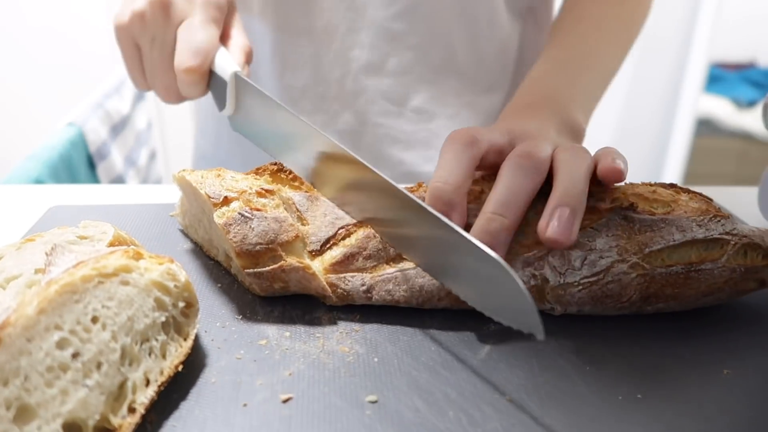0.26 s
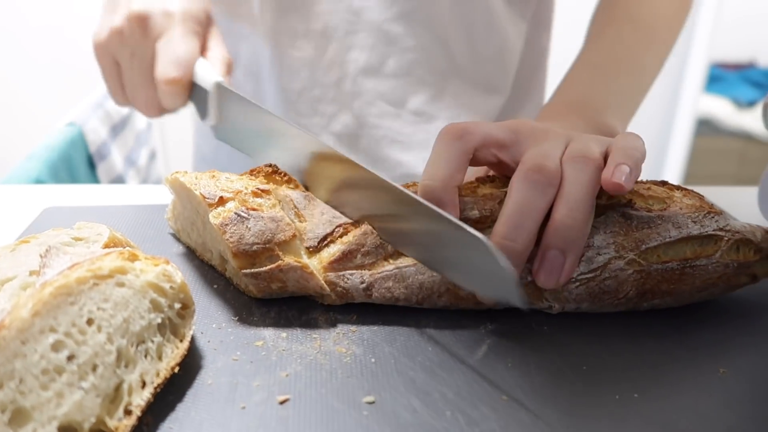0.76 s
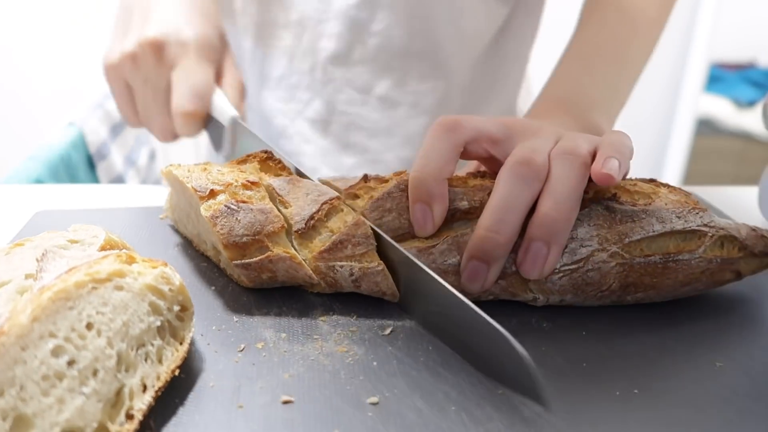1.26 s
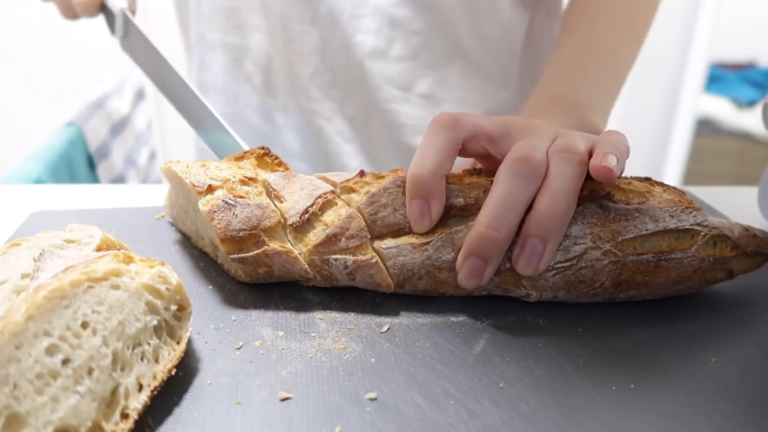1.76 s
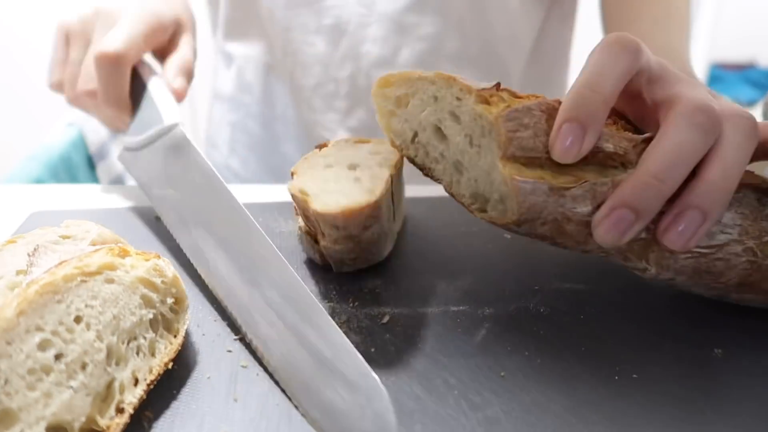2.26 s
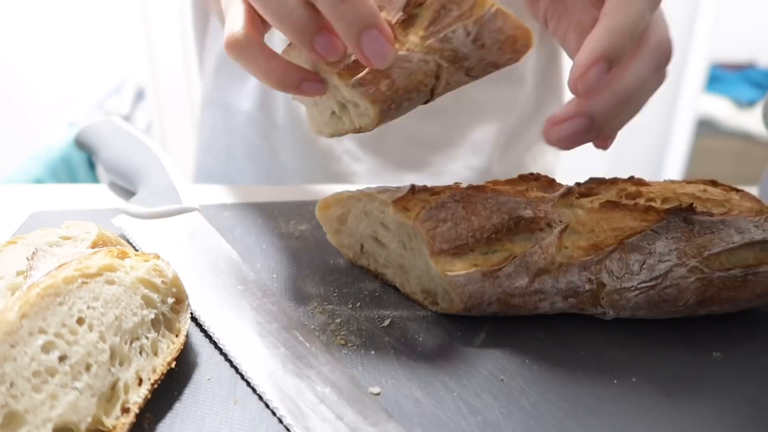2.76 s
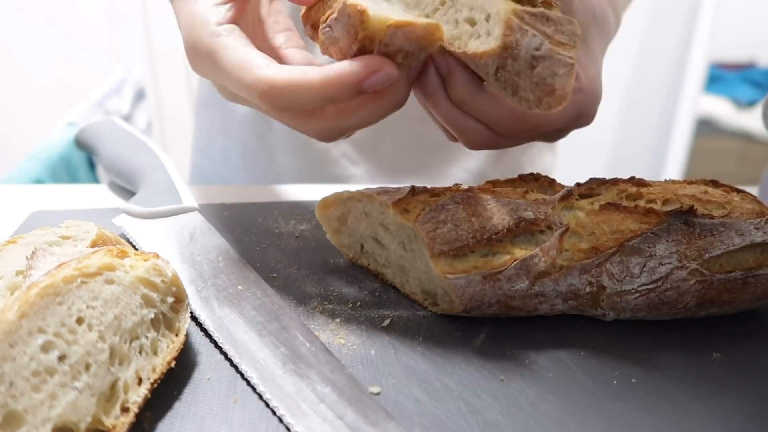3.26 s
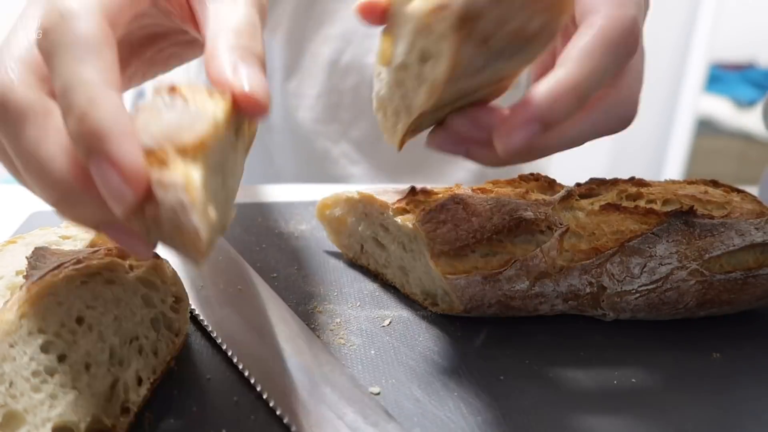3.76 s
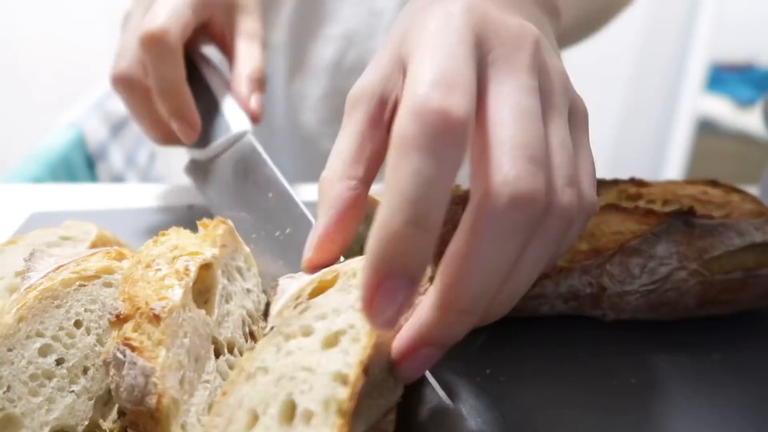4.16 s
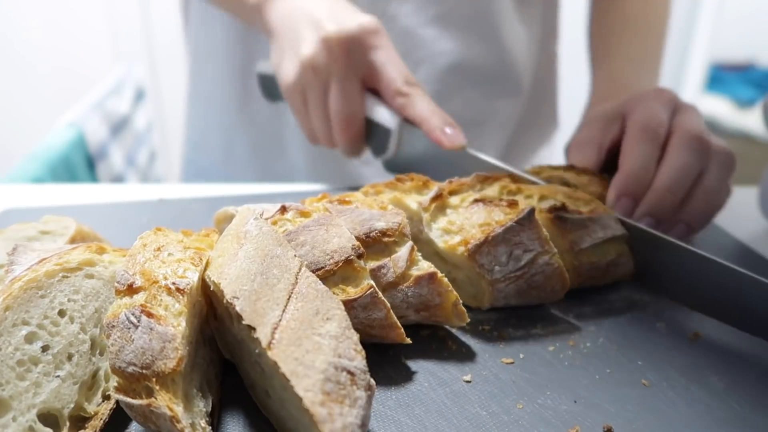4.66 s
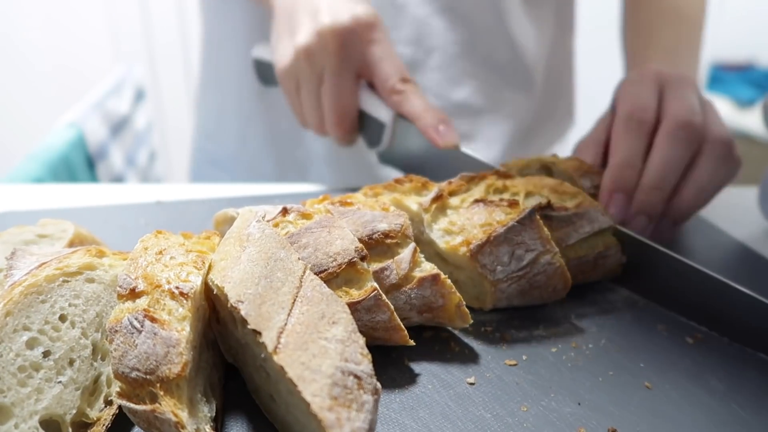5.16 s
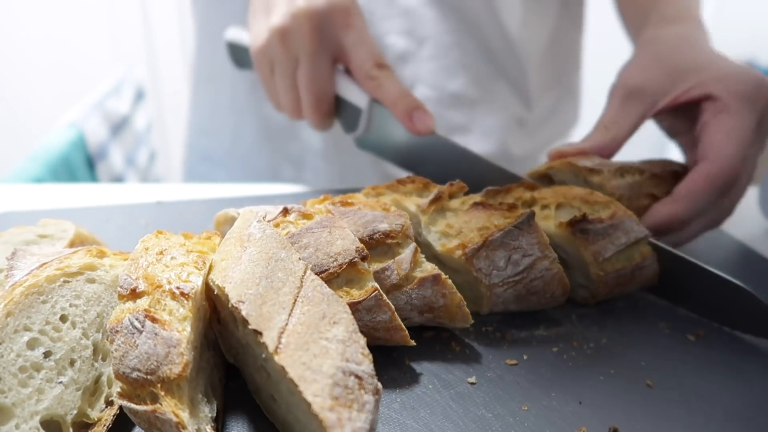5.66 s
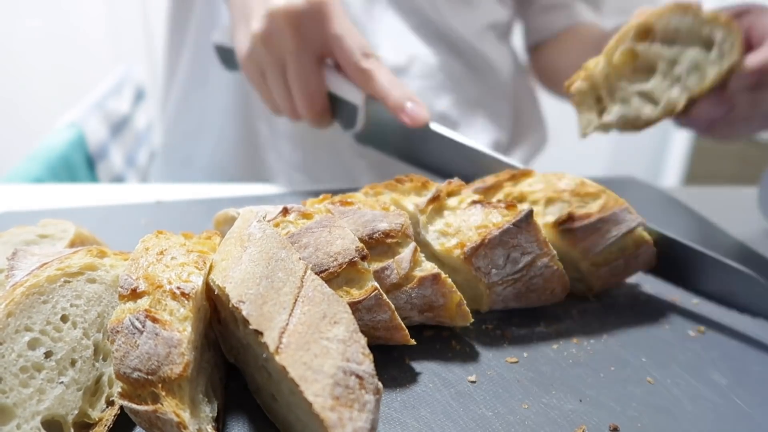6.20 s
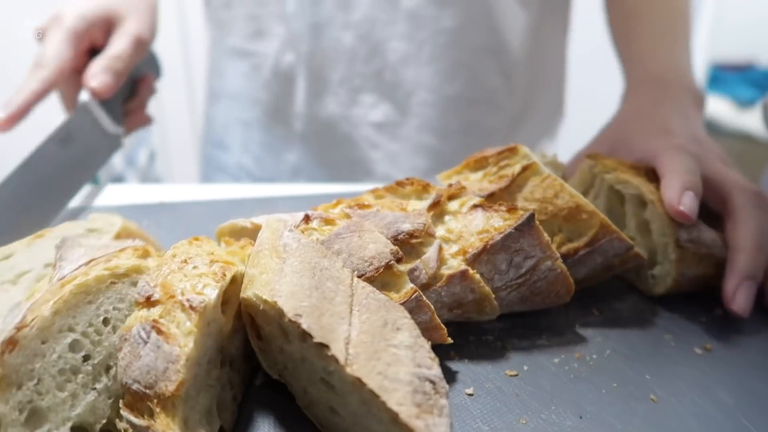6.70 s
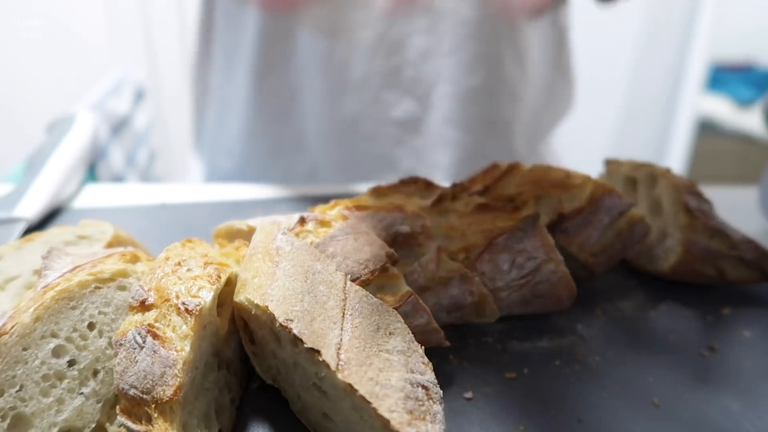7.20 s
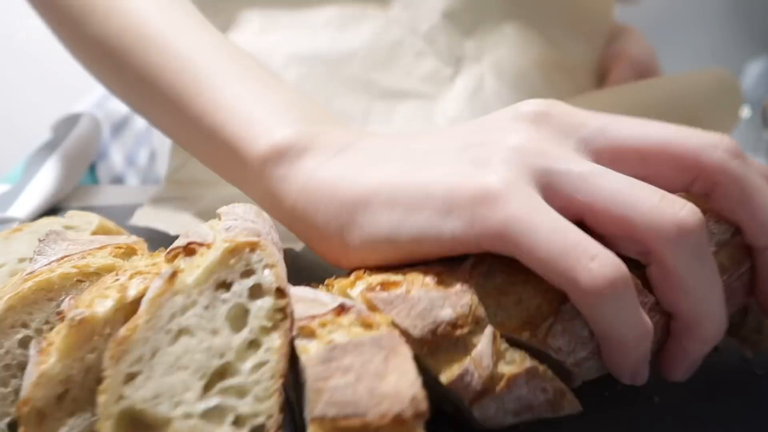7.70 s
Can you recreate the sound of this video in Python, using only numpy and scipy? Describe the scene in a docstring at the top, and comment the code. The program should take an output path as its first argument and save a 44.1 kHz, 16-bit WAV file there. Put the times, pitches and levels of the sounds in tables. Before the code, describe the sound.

Rapid back-and-forth bread sawing, each stroke a low woody judder with crisp crust breaking, gives way to tearing snaps and short clanks on a board. A near-silent pause with faint crust rustle leads to knocks, then a shorter sawing run. Loose crust ticks and scrapes, a piece thuds down, and hands crunch the slices together. Close, dry kitchen sound with faint air and appliance hum.

```python
"""Sawing a crusty baguette

A crusty baguette is sawn with a serrated knife on a plastic board, pulled apart and gathered up,
close to a microphone in a small kitchen. Each bite of the teeth is a burst of random crust fractures
in step with a gliding judder tone; the blade squeaks as a harmonic stick-slip tone and knocks the board
as a few decaying modes. Between cuts the crust scrapes and snaps under the fingers as filtered grains,
over noise for room air and a faint appliance hum of drifting sines."""
import sys
import numpy as np
from scipy import signal
from scipy.fft import rfft, irfft
from scipy.io import wavfile
from scipy.ndimage import map_coordinates

SR = 44100
rng = np.random.default_rng(int(sys.argv[2]) if len(sys.argv) > 2 else 0)


def wav_record(signal):
    """Record a signal, one row per channel, as 16-bit PCM in the file named by sys.argv[1]."""
    frames = np.transpose(np.atleast_2d(signal))
    bounded = np.clip(frames, -1, 1)
    # unit amplitude maps onto the largest positive 16-bit level
    quanta = np.round(bounded * 32767).astype(np.int16)
    wavfile.write(sys.argv[1], SR, quanta)


N = 350154
TIME = np.arange(N) / SR


def undb(db):
    """Amplitude of a level in dB."""
    return 10 ** (np.asarray(db) / 20)


def unit(x):
    """Scale to rms 1."""
    return x / np.sqrt(np.mean(x ** 2) + 1e-18)


def rms(x):
    """Root mean square."""
    return np.sqrt(np.mean(x ** 2))


def add(track, s, x):
    """Mix x into the track from time s on."""
    i = max(int(s * SR), 0)
    track[i:i + len(x)] += x[:max(N - i, 0)]


def clock(length):
    """Sample times of one event."""
    return np.arange(max(int(length * SR), 64)) / SR


def walk(n, rate):
    """Smooth random drift with a spread near 1, through `rate` random points per second."""
    at = np.arange(n) * rate / SR
    points = rng.standard_normal(int(at[-1]) + 3)
    return 1.284 * map_coordinates(points, [at], order=2, mode="nearest")


def highpass(order, hz):
    """Butterworth high-pass sections."""
    return signal.butter(order, hz, "high", fs=SR, output="sos")


def resonate(x, hz, width_hz):
    """One resonance, gain 1 at its centre."""
    return signal.lfilter(*signal.iirpeak(hz, hz / width_hz, fs=SR), x)


def colour(x, points, tilt=0, ripple_db=0, size=1024):
    """Causal filter from a spectrum and a tilt; the ripple stands for the resonances of one patch of crust."""
    hz = np.maximum(np.arange(size // 2 + 1) * SR / size, 1)
    f, db = np.transpose(points)
    db = np.interp(np.log(hz), np.log(f), db)
    # the tilt in dB per octave pivots at 4 kHz
    db = db + tilt * np.log2(np.clip(hz, 1500, 10500) / 4000)
    db = db + ripple_db * walk(len(hz), 3436)
    # folding the cepstrum gives minimum phase, so nothing sounds before the strike
    cepstrum = irfft(np.log(undb(np.maximum(db, db.max() - 67.5))))
    cepstrum[1:size // 2] *= 2
    cepstrum[size // 2 + 1:] = 0
    return signal.fftconvolve(x, irfft(np.exp(rfft(cepstrum))))[:len(x)]


def patches(x, points, tilt, ripple_db, patch_s=0.01564):
    """Colour a run of fractures as it crossfades between patches of crust, each with its own resonances."""
    at = np.arange(len(x)) / (patch_s * SR)
    out = np.zeros(len(x))
    for k in range(int(at[-1]) + 2):
        on_patch = np.maximum(1 - np.abs(at - k), 0)
        out += colour(x * on_patch, points, tilt, ripple_db)
    return out


def fractures(n, rate, spread_db):
    """Random tiny breaks at `rate` per second: many small, a few large."""
    size = undb(spread_db * np.minimum(rng.exponential(size=n), 4))
    breaks = rng.random(n) < rate / SR
    return unit(breaks * size * rng.choice([-1, 1], n))


def swell(t, centre, length, steep=3):
    """A rounded burst whose energy is that of a flat one of this length."""
    shape = np.exp(-np.abs((t - centre) / (.42 * length)) ** steep)
    return shape * np.sqrt(length * SR / np.sum(shape ** 2))


# response of the soft loaf on the board: (f/Hz, level/dB)
LOAF_RESPONSE = [(40, -45), (120, -38.5), (200, -21.5), (310, -6), (425, 0), (520, -2.5), (630, -14),
                 (760, -24), (950, -30.5), (1300, -23.5), (3000, -63)]


def loaf(x, hz=425):
    """The loaf's broad low resonance, shifted to where the pressure puts it."""
    return colour(x, np.array(LOAF_RESPONSE) * [hz / 425, 1])


# bites of the teeth: (centre t/s, length/s, crunch level/dB, judder level/dB, nominal judder f/Hz)
TOOTH_BITES = [(0.029, 0.038, -52, -46, 435), (0.078, 0.045, -40.5, -29, 428.6),
               (0.122, 0.039, -33, -21.5, 371), (.172, 0.052, -32, -23.5, 435.6),
               (0.233, 0.043, -34.5, -17, 411), (0.276, 0.034, -42, -29.5, 420),
               (0.477, 0.0316, -55.5, -35, 399.4), (0.641, 0.053, -55, -34.5, 428.5),
               (0.685, 0.038, -38, -23.5, 384.7), (.735, 0.056, -37.5, -24.5, 407.6),
               (.802, 0.038, -36.5, -19, 412.6), (0.857, 0.058, -33, -22.5, 343.3),
               (.917, 0.042, -36, -16.5, 434), (.964, 0.04, -30, -22, 433.3),
               (1.034, 0.049, -43, -21.5, 444.5), (1.09, 0.062, -43, -35, 440),
               (1.183, .052, -35.5, -29.5, 454.4), (1.243, 0.061, -35, -25.5, 434),
               (1.315, .048, -35, -21, 487.4), (1.374, 0.05, -34, -30.5, 457),
               (1.451, 0.073, -35, -20.5, 463.7), (1.484, 0.016, -39, -21, 413),
               (1.535, .036, -47.5, -26.5, 471), (1.576, 0.064, -35, -27.5, 478),
               (1.662, 0.084, -37.5, -19.5, 403.5), (1.703, 0.086, -50.5, -32, 401.5),
               (1.759, 0.044, -44.5, -27.5, 423.5), (1.848, 0.061, -61, -40.5, 440),
               (4.235, 0.047, -38, -36.5, 430.6), (4.286, 0.029, -35, -26, 458),
               (4.336, 0.047, -32, -29, 451.5), (4.386, 0.038, -29.5, -18.5, 401),
               (4.439, 0.051, -29.5, -25.8, 411.6), (4.504, 0.033, -31, -17.5, 408.7),
               (4.563, 0.059, -30.5, -23.5, 458.4), (4.633, 0.041, -42, -23.5, 413.5),
               (4.685, 0.049, -38, -33.5, 417), (4.771, 0.057, -43.5, -33, 431.5),
               (4.839, .064, -38, -30, 431.8), (4.919, 0.064, -41, -26.5, 477.3),
               (4.976, 0.045, -36, -30, 480.7)]
# colour of breaking crust: (f/Hz, level/dB per Hz)
CRUNCH_COLOUR = [(470, -19.5), (800, -9.5), (967, -22.5), (1200, -3.5), (1710, -6.5), (2150, -0.5),
                 (2730, -10.5), (3140, -3), (3900, -2), (4710, -3.5), (5150, -2), (7530, -2.5), (15100, -8),
                 (15900, -24), (16500, -46)]
# the loaf answers a little after the tooth; a hard bite locks into a clean judder, which is shorter
JUDDER_LAG_S, JUDDER_S, LOCK_SHORTENS = 0.0047, 0.0569, .25
LOCK_FROM_DB, LOCK_RANGE_DB = -34, 15
# the crunch is duller the more of the bite goes into the judder: dB/octave, and its fall per dB of
# judder over crunch
BITE_TILT, BITE_DULLING = 0.14, 0.19
# near the heel of the loaf the crust is harder and rings as it breaks; the level is relative to the crunch
HEEL_FROM_S, HEEL_HZ, HEEL_WIDTH_HZ, HEEL_DB = 4.1, 3740, 720, -5.5


def sawing(rumble_db=-56, skew=0.19):
    """Teeth catch the crust: the loaf judders, fastest in mid-bite, and crust breaks in step with it."""
    out = np.zeros(N)
    for s, length, db, judder_db, hz in TOOTH_BITES:
        start = max(s - .07, 0)
        t = start + clock(0.15)
        n = len(t)
        # hard bites lock into a clean judder, light ones mostly rattle the loaf
        lock = np.clip((judder_db - LOCK_FROM_DB) / LOCK_RANGE_DB, .15, .975)
        judder_s = s + JUDDER_LAG_S
        judder_length = np.sqrt(length * JUDDER_S) * (1 - LOCK_SHORTENS * lock)
        arch = 1.035 - .13 * np.minimum(((t - judder_s) / (0.397 * judder_length)) ** 2, 2.5)
        pitch = hz * arch * (1 + 0.046 * walk(n, 111.7))
        phase = 2 * np.pi * np.cumsum(pitch) / SR
        tone = unit(np.sin(phase) * undb(0.84 * walk(n, 108.7)))
        rattle = unit(loaf(rng.standard_normal(n), hz))
        push = swell(t, judder_s, judder_length * 0.95, steep=2.87)
        judder = unit((np.sqrt(lock) * tone + np.sqrt(1 - lock) * rattle) * push) * rms(push)
        # fractures pulse with the judder and thin out slightly through the bite, in ragged clusters
        breaks = fractures(n, 3200, 4) * (1 + .55 * np.sin(phase)) + .28 * rng.standard_normal(n)
        edges = swell(t, s, length * .92, steep=3.6)
        bite = edges * np.exp(-skew * np.clip((t - s) / length, -1, 1))
        clusters = breaks * bite * undb(1.07 * walk(n, 220))
        tilt = BITE_TILT - BITE_DULLING * (judder_db - db)
        crunch = unit(patches(clusters, CRUNCH_COLOUR, tilt, ripple_db=3.0)) * rms(bite)
        if s > HEEL_FROM_S:
            crunch = crunch + undb(HEEL_DB) * resonate(crunch, HEEL_HZ, HEEL_WIDTH_HZ)
        # the uneven force leaves a little deep rumble
        rumble = unit(resonate(rng.standard_normal(n), 70, 140)) * push * undb(judder_db + rumble_db)
        add(out, start, undb(judder_db) * judder + undb(db) * crunch + rumble)
    return out


# teeth dragging hard enough to make the blade rasp: (t/s close to mid-drag, length/s, level/dB)
BLADE_RASPS = [(0.178, 0.06, -42), (0.735, 0.052, -42.5), (1.188, 0.03, -40), (1.248, 0.048, -34),
               (1.325, 0.054, -48), (1.462, 0.094, -46), (1.577, 0.074, -40), (1.666, 0.078, -44.5),
               (4.846, 0.034, -40.5), (4.917, 0.023, -55), (4.978, 0.038, -40.5)]
# resonances of the blade held in the loaf: (f/Hz, width/Hz, level/dB)
HELD_BLADE_MODES = [(780, 95, -1), (1217, 133, 0), (1480, 190, -5), (1840, 82, -5.5)]


def rasping():
    """The dragged blade chatters in its low bending resonances, damped by the crumb."""
    out, t = np.zeros(N), clock(.12)
    for s, length, db in BLADE_RASPS:
        drag = swell(t, 0.057, length)
        chatter = fractures(len(t), 2500, 3.9) * drag
        blade = np.zeros(len(t))
        for hz, width, mode_db in HELD_BLADE_MODES:
            blade += undb(mode_db) * resonate(resonate(chatter, hz, width), hz, 3 * width)
        add(out, s - .06, undb(db) * unit(blade) * rms(drag))
    return out


# the blade sticking and slipping:
# (start t/s, length/s, nominal f/Hz, level/dB, fall per harmonic/dB, pitch jitter/share of f)
BLADE_SQUEAKS = [(0.598, 0.066, 953, -35.5, 1.5, .008), (1.979, 0.0096, 839, -38.5, 4, 0.12),
                 (2.017, 0.01, 781, -37.5, 8, .09), (6.192, 0.021, 810, -42.5, 22, .04)]
# glide of a squeak: (t/share of its length, pitch/ratio to nominal f)
SQUEAK_GLIDE = [(0, 1.24), (.15, 1.11), (.33, 0.99), (.6, 1.004), (1, .89)]


def squeaking():
    """The blade sticks and slips in the crust: a harmonic tone whose pitch falls overall."""
    out = np.zeros(N)
    for s, length, hz, db, fall_db, rough in BLADE_SQUEAKS:
        t = clock(length)
        u = t / t[-1]
        glide = np.interp(u, *np.transpose(SQUEAK_GLIDE))
        phase = 2 * np.pi * np.cumsum(hz * glide * (1 + rough * walk(len(t), 732))) / SR
        # upper harmonics speak only while the pressure is high; the blade favours the third and fifth
        press = np.maximum(np.sin(np.pi * u ** 0.99), 0)
        voice = np.zeros(len(t))
        for k in range(1, 8):
            harmonic_db = -fall_db * k + 7.8 * (k == 3) + 8.2 * (k == 5)
            voice += undb(harmonic_db) * press ** (0.76 + .5 * k) * np.sin(k * phase)
        add(out, s, undb(db) * unit(voice))
    return out


# the blade striking the board: (t/s, level/dB added to every mode)
BLADE_CLANKS = [(2.2955, -10.5), (2.3997, -40), (1.6, -76)]
# modes of the blade: (f/Hz, level/dB, t60/s)
BLADE_MODES = [(696, -23, 0.1), (1455, -4.5, 0.033), (1690, -26, 0.069), (2070, 8.5, 0.011),
               (2310, -20, 0.066), (2830, -2.5, 0.015), (3130, -21.5, 0.078), (3680, -16, .045)]


def clanking():
    """The blade rings briefly where it meets the board: a sum of decaying modes with a soft onset."""
    out, t = np.zeros(N), clock(.15)
    onset = 1 - np.exp(-t / 0.00067)
    ring = sum(undb(mode_db - 60 * t / t60) * np.sin(2 * np.pi * f * t) for f, mode_db, t60 in BLADE_MODES)
    for s, db in BLADE_CLANKS:
        add(out, s, undb(db) * ring * onset)
    return out


def impact(db, tilt, t60, thump_db, hz, thump_t60=0.053, tail_db=-23, tail_t60=0.086):
    """A sharp break, a short crumble after it, and a thump of loaf and board."""
    t = clock(0.067)
    click = 1.24 * undb(-60 * t / 0.00047)
    fade = undb(-60 * t / t60) + click + undb(tail_db - 60 * t / tail_t60)
    crack = colour(fractures(len(t), 16000, 0.28) * fade, CRUNCH_COLOUR, tilt)
    ring = resonate(np.sin(2 * np.pi * hz * t) * undb(-60 * t / thump_t60), hz, 250)
    thud = loaf(rng.standard_normal(len(t)) * undb(-60 * t / 0.04), hz)
    thump = unit(unit(ring) + 0.8 * unit(thud))
    # every impact shares a 10 dB trim
    return np.sqrt(1 / 10) * (undb(db) * unit(crack) + undb(thump_db) * thump)


# the last bridge of crust tearing, one fibre after another; levels before the impact trim
TEAR_S, TEAR_LENGTH_S, TEAR_PER_S = 2.036, .041, 125  # start, length, mean snaps per second
TEAR_FIRST_DB, TEAR_LAST_DB = -38, -37
SNAP_T60_S, SNAP_HZ = 0.012, 420


def tearing(tilt=.4, t60=.0065, thump_db=-49):
    """The slice is pulled off in a quick, uneven run of dry snaps."""
    out = np.zeros(N)
    steps = rng.uniform(.7, 1.3, 12) / TEAR_PER_S
    for s in np.cumsum(steps) - steps[0]:
        if s < TEAR_LENGTH_S:
            db = np.interp(s, [0, TEAR_LENGTH_S], [TEAR_FIRST_DB, TEAR_LAST_DB])
            add(out, TEAR_S + s, impact(db, tilt, t60, thump_db, SNAP_HZ))
    return out


# crust rubbing on fingers, blade and board:
# (start t/s, length/s, level/dB before short scuffs are softened, pressure/0-1)
CRUST_RUBS = [(0.413, 0.032, -54, 0.52), (1.882, 0.078, -51, .72), (1.977, 0.013, -44, 0.68),
              (2.034, .05, -44, .55), (2.092, 0.011, -30, .68), (2.14, 0.012, -50.5, 0.67),
              (2.223, 0.089, -43, .8), (2.298, .018, -37, .78), (2.328, .055, -50, 0.56),
              (2.546, 0.009, -36, 0.72), (2.607, 0.045, -53, 0.7), (2.676, 0.017, -38, 0.67),
              (2.757, 0.021, -44.5, 0.53), (3.033, 0.055, -55.5, 0.26), (3.32, .12, -55.5, 0.02),
              (3.891, 0.035, -37.5, 0.99), (3.934, 0.023, -48, 0.86), (3.992, 0.033, -49, 0.5),
              (4.033, 0.0062, -35.5, 0.35), (4.065, 0.0075, -46, 0.67), (4.108, 0.054, -59, .95),
              (4.17, 0.027, -41.5, 0.76), (5.142, .052, -52.5, 0.47), (5.204, 0.033, -45.5, 0.41),
              (5.266, 0.033, -51, 0), (5.401, 0.018, -32, 0.56), (5.44, .037, -38.5, 0.34),
              (5.53, 0.011, -38.5, 0.43), (5.591, 0.049, -47, 0.44), (5.901, 0.081, -53, 0.46),
              (6.189, .051, -46.5, 0.4), (6.3, 0.014, -40.5, 0.98), (6.327, 0.051, -49, 0.89),
              (6.421, .04, -52, 0.97), (6.501, 0.048, -48, 0.91), (6.569, 0.011, -47.5, 0.65),
              (6.616, 0.05, -48.5, 0.63), (6.666, 0.051, -39.5, 0.58), (6.719, 0.057, -48, 0.46),
              (6.807, 0.03, -45, 0.36), (6.836, 0.06, -43.5, 0.75), (7.05, 0.065, -54.5, 0),
              (7.361, 0.049, -55.5, .03), (7.549, .011, -32, 0.54), (7.573, 0.035, -42.5, 0.47),
              (7.615, 0.053, -34, .7), (7.661, 0.055, -25.5, 0.54), (7.716, 0.024, -34.5, 0.65),
              (7.738, 0.067, -44.5, 0.99), (7.802, 0.045, -27, 0.37), (7.881, 0.048, -44, 0.36)]
# colour of sliding crust: (f/Hz, level/dB per Hz)
SCRAPE_COLOUR = [(500, -32), (780, -10.5), (930, -17), (1200, -4.5), (1650, -13), (2250, -4.5), (2700, -16),
                 (3400, -3), (4500, -3.5), (6500, 1), (9800, 2), (12500, -2), (15300, -6), (16500, -46)]
# resonances of a stiff patch of crust: (f/Hz, width/Hz, level/dB)
STIFF_CRUST = [(4580, 160, 7.5), (5226, 360, 10), (5500, 200, -7.5)]
# a light brush is bright and thin, a firm rub is dull, rings the crust and stirs the loaf:
# (at no pressure, at full pressure), tilt in dB/octave, the others in dB over the scrape
RUB_TILT, RUB_RING_DB, RUB_BODY_DB = (4.2, -7.5), (-29.5, 9), (-14, 2.5)
# louder slides are faster and catch more often: catches per s at the reference level,
# and dB of rate per dB of level
CATCHES_PER_S, CATCH_REF_DB, CATCH_GROWTH = 3800, -45, .7


def rubbing():
    """Dense little catches of sliding crust ring the crust and stir the loaf, more so under firm pressure."""
    out = np.zeros(N)
    for s, length, db, pressure in CRUST_RUBS:
        t = clock(length + 0.023)
        n = len(t)
        tilt, ring_db, body_db = (np.interp(pressure, [0, 1], ends)
                                  for ends in (RUB_TILT, RUB_RING_DB, RUB_BODY_DB))
        # short scuffs start almost at once, long slides swell
        rise = np.minimum(t / (0.0013 + 1.56 * length ** 2), 1)
        release = np.exp(-np.maximum(t - length, 0) / 0.0057)
        contact = rise * release * undb(2.1 * walk(n, 181.5))
        rate = CATCHES_PER_S * undb(CATCH_GROWTH * (db - CATCH_REF_DB))
        catches = (fractures(n, rate, 3.75) + .3 * rng.standard_normal(n)) * contact
        ring = np.zeros(n)
        for hz, width, mode_db in STIFF_CRUST:
            ring += undb(mode_db) * resonate(catches, hz * (1 + 0.0027 * rng.standard_normal()), width)
        scrape = patches(catches, SCRAPE_COLOUR, tilt, ripple_db=4.0)
        rub = unit(scrape) + undb(ring_db) * unit(ring) + undb(body_db) * unit(loaf(catches))
        share = np.sqrt(length / (length + 0.032))
        add(out, s, share * undb(db) * rub)
    return out


# snaps of crust, before the impact trim: (t/s, crack level/dB, tilt/dB per octave, thump level/dB)
CRUST_SNAPS = [(.1064, -40, 7, -29), (.1601, -33, 8, -25), (.332, -42, 2, -41), (.5919, -31.5, 21, -44.5),
               (0.7863, -38, -7, -37), (.871, -22.5, 0.5, -41), (0.903, -29.5, 6, -50),
               (0.958, -28.5, 6, -50), (1.4092, -33, -2, -35), (1.531, -34.5, 8, -48),
               (1.765, -43.5, 16, -45), (2.353, -42, -1, -38), (3.3214, -39.5, 7.5, -64),
               (3.6674, -36, 12.5, -48.5), (3.8295, -43.5, -1.5, -52), (4.0053, -41.5, 6, -31),
               (4.249, -32.5, 3, -36), (4.379, -26, -6.5, -28), (4.5747, -27, 10, -52),
               (5.0576, -48.8, 4, -34), (5.1385, -34, 3.5, -33.5), (5.1674, -40, 5, -36.5),
               (5.2925, -34, 5, -36.5), (5.3883, -42, 2, -47), (5.4684, -29.5, 6, -34.5),
               (5.7113, -39.5, 3, -59), (5.757, -42.5, 12, -60), (5.8322, -37, 4.5, -37),
               (6.1357, -37.5, 5, -32.5), (6.3016, -41, -2, -42), (6.4239, -38.5, 5, -44),
               (6.452, -41.5, 7, -44), (6.543, -37.5, 1, -45), (6.01, -48, 2.5, -53),
               (6.6966, -33.5, 5, -45), (6.7944, -22.5, 5.5, -30.5), (6.807, -41, 5, -52),
               (7.1795, -45, 8, -46.5), (7.2643, -35.5, 1.5, -52), (7.3564, -45, 6, -50.5),
               (7.4667, -34.5, 5.5, -40), (7.8089, -26.5, -1, -45)]


def snapping(pitch_scatter=0.058):
    """Bits of crust snap under fingers and blade; each nudges the loaf at a slightly different pitch."""
    out = np.zeros(N)
    for s, db, tilt, thump_db in CRUST_SNAPS:
        hz = SNAP_HZ * (1 + pitch_scatter * rng.standard_normal())
        add(out, s, impact(db, tilt, SNAP_T60_S, thump_db, hz))
    return out


# bread or blade knocking on the board, before the impact trim: (t/s, crack level/dB, thump level/dB)
BOARD_KNOCKS = [(2.0794, -32, -35), (2.0907, -21.5, -23.5), (2.2951, -32, -26.5), (2.3998, -19.5, -22),
                (2.6794, -39, -35.5), (2.7904, -28, -37.5), (3.889, -34.5, -19.5), (3.8938, -25.5, -30),
                (6.9374, -22, -15.5)]
# a heavier, softer landing has a duller crack: dB/octave, and its fall per dB of thump over crack
KNOCK_TILT, KNOCK_DULLING, KNOCK_T60_S, KNOCK_HZ = -3, 0.37, 0.016, 440


def knocking():
    """Bread and blade land on the board, with a longer crack than a snap, duller the heavier the thump."""
    out = np.zeros(N)
    for s, db, thump_db in BOARD_KNOCKS:
        tilt = KNOCK_TILT - KNOCK_DULLING * (thump_db - db)
        add(out, s, impact(db, tilt, KNOCK_T60_S, thump_db, KNOCK_HZ))
    return out


# the loaf pressed or set down on the board: (centre t/s, level/dB)
LOAF_BUMPS = [(0.13, -47), (0.183, -34), (0.747, -32), (.864, -38), (1.099, -41.5), (1.55, -37),
              (1.679, -41.5), (2.095, -42), (2.401, -46.5), (2.685, -44), (2.797, -45), (3.9, -37.5),
              (4.263, -47), (4.345, -37), (4.389, -38), (4.845, -37), (7.803, -43), (7.835, -39)]


def bumping(hz=235, width_hz=110, deep_db=-15):
    """A soft push rocks the board below the loaf's resonance and thuds into the counter."""
    out, t = np.zeros(N), clock(0.04)
    for s, db in LOAF_BUMPS:
        force = rng.standard_normal(len(t)) * swell(t, .015, 0.038)
        board = resonate(resonate(force, hz, width_hz), hz, 2 * width_hz)
        counter = resonate(resonate(force, 91, 230), 75, 260)
        add(out, s - .015, undb(db) * (unit(board) + undb(deep_db) * unit(counter)))
    return out


# faint sounds of the held loaf, before the trims flake_db and body_db:
# (t/s, ticking flakes level/dB, loaf body level/dB)
HELD_LOAF = [(0.0, -47, -37.5), (0.42, -65, -53.5), (0.6, -46.5, -54), (0.82, -50, -35),
             (1.55, -46.5, -39.5), (1.79, -56.5, -49), (2.23, -58.5, -55), (2.37, -63, -64.5),
             (3.76, -60.5, -61.5), (4.29, -47, -43.5), (4.44, -43, -37.5), (5.26, -53, -49.5),
             (5.97, -55, -51.5), (6.74, -62.5, -56), (7.05, -69, -64), (7.56, -54, -61), (7.72, -31.5, -57),
             (7.94, -40.5, -45)]


def handling(flake_db=-5, body_db=-3, crumble_s=0.0015, flake_tilt=0.66):
    """Fine flakes tick, each a tiny crumble of noise, and the loaf murmurs as long as it is held."""
    s, flakes, body = np.transpose(HELD_LOAF)
    crumbles = signal.fftconvolve(fractures(N, 600, 5.3) ** 2, np.exp(-clock(.02) / crumble_s))[:N]
    grains = np.sqrt(np.abs(crumbles)) * rng.standard_normal(N)
    ticks = unit(colour(grains, CRUNCH_COLOUR, flake_tilt))
    murmur = unit(loaf(rng.standard_normal(N))) * undb(2.45 * walk(N, 30))
    ticks = ticks * undb(np.interp(TIME, s, flakes) + flake_db)
    return ticks + murmur * undb(np.interp(TIME, s, body) + body_db)


def kitchen(x, t60=0.37, room_db=-24, port_db=-8, gap_db=-16, gap_hz=1050):
    """Weak reflections; the two microphone ports hear the same bass but drift out of step higher up."""
    t = clock(.35)
    fade = undb(-60 * t / t60) * np.minimum(t / 0.0016, 1)
    mid, side = (rng.standard_normal(len(t)) * fade for _ in range(2))
    side = signal.sosfilt(highpass(6, 700), side)
    gain = undb(room_db) / np.sqrt(np.sum(mid ** 2))
    # the difference between the ports is a quarter cycle off, so neither is louder
    top = signal.sosfiltfilt(highpass(1, 11000), x)
    band = signal.butter(2, [gap_hz / 1.9, gap_hz * 1.28], "band", fs=SR, output="sos")
    middle = signal.sosfiltfilt(band, x)
    ports = undb(port_db) * np.gradient(top)
    ports = ports + undb(gap_db) * np.gradient(middle) * SR / (2 * np.pi * gap_hz)
    return np.array([x + sign * ports + gain * signal.fftconvolve(x, .5 * mid + sign * side)[:N]
                     for sign in (1, -1)])


# colour of room air: (f/Hz, level/dB per Hz)
AIR_COLOUR = [(18, -55), (30, -35), (48, -45), (80, -18.5), (185, -3.5), (323, -7), (388, -4.5),
              (506, -12.5), (881, -16), (1090, -14.5), (2740, -20), (13000, -30.5), (15200, -30),
              (16500, -40)]
# appliance hum: (f/Hz, level/dB)
APPLIANCE_HUM = [(199, -64), (398, -59.5), (717, -75)]


def background(air_db=-60, hiss_db=-68):
    """Coloured noise for room air, a wavering hum of sines and the treble hiss of each port."""
    air = undb(air_db) * unit(colour(rng.standard_normal(N), AIR_COLOUR, size=4096))
    hum = np.zeros(N)
    for hz, db in APPLIANCE_HUM:
        hum += undb(db) * unit(np.sin(2 * np.pi * hz * TIME + 0.26 * walk(N, 4.7)))
    hiss = undb(hiss_db) * unit(np.diff(rng.standard_normal((2, N + 1))))
    return air + hum + hiss


def scene():
    """Knife, crust and board in the kitchen, over its steady background."""
    cutting = sawing() + rasping() + tearing()
    bread = cutting + rubbing() + snapping() + knocking() + bumping() + handling()
    knife = squeaking() + clanking()
    return kitchen(bread + knife) + background()


def record(dry, top_hz=16100):
    """The recorder trims the deep bass, rounds the highest peaks and cuts the top."""
    thin = signal.sosfilt(highpass(1, 70), dry)
    rounded = 0.83 * np.tanh(thin / 0.78)
    return signal.sosfilt(signal.ellip(10, .2, 80, top_hz, fs=SR, output="sos"), rounded)


dry = scene()
out = record(dry)
wav_record(out)
```